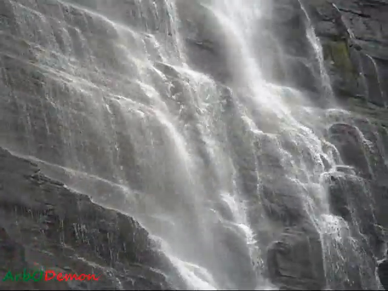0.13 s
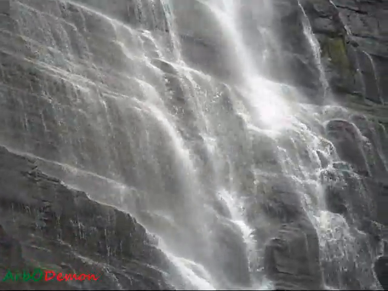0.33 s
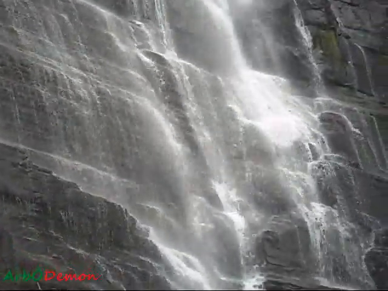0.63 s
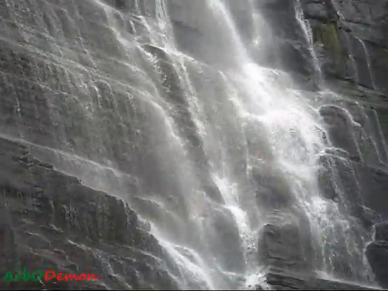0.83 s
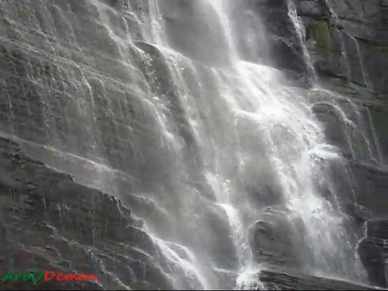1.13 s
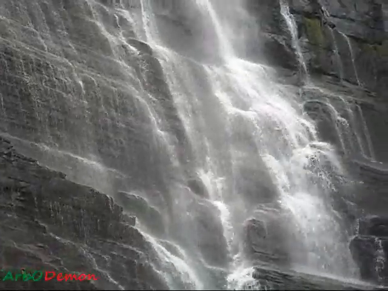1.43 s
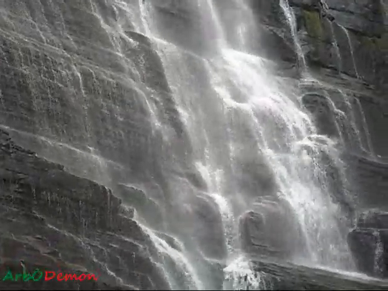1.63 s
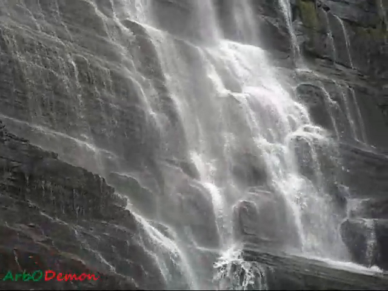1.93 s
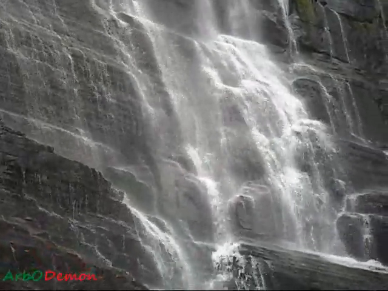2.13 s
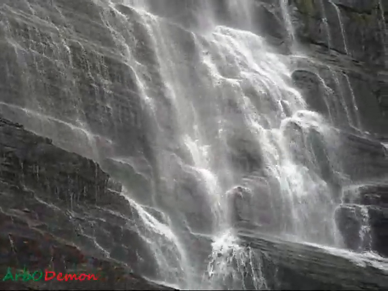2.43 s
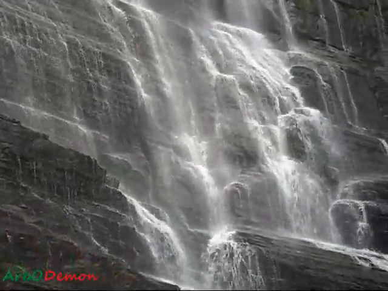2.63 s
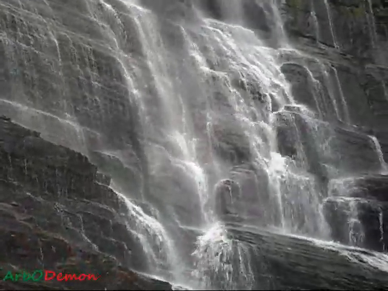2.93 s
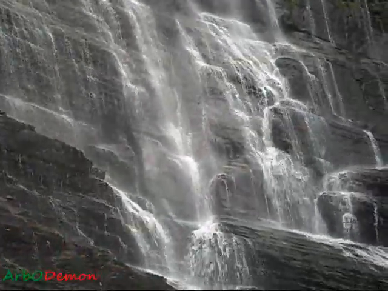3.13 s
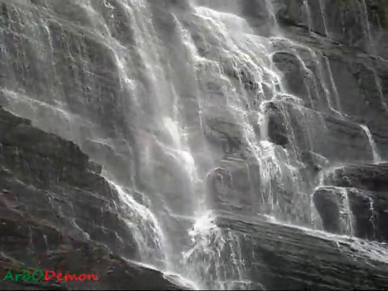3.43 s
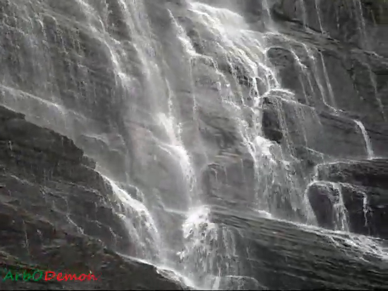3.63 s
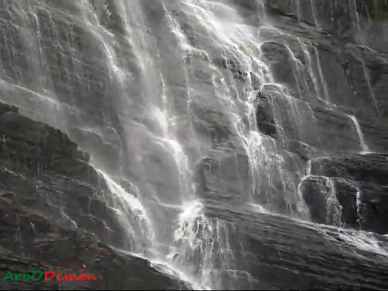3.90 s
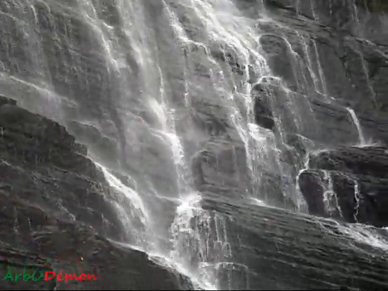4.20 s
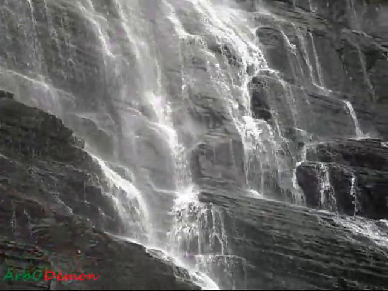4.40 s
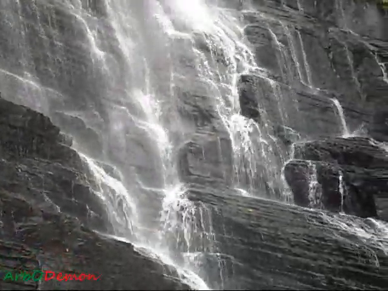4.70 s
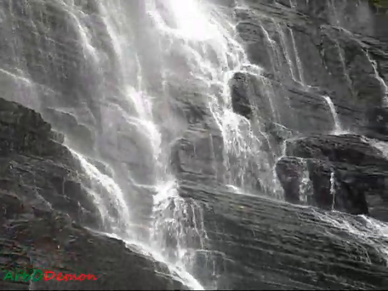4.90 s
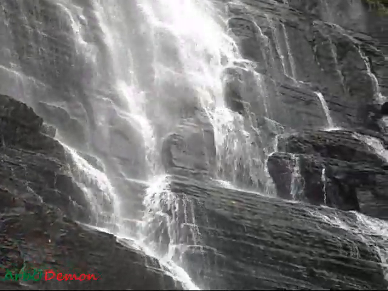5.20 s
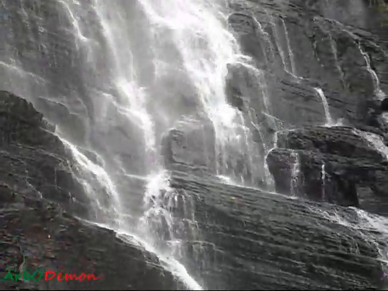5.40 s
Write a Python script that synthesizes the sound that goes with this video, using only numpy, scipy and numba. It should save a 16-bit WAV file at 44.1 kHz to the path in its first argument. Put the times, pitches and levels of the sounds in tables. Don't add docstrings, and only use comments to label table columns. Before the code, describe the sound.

Continuous hissing roar of water falling down a rock face, heard from across its pool, even from start to end. Faint wind rumble comes and goes, with dull pops and flutters bunched around 2.1 to 2.6 seconds, a small bump near 3.4 and a soft deep swell near 4.5. Small unshielded camera microphone, essentially mono, slightly grainy high end, no clear echo.

```python
import sys
import numpy as np
from scipy import signal
from scipy.fft import rfft, irfft
from scipy.io import wavfile
from scipy.ndimage import uniform_filter1d
from numba import njit

SR = 44100
rng = np.random.default_rng(int(sys.argv[2]) if len(sys.argv) > 2 else 0)


def undo_db(level):
    steps = np.asarray(level, float) / 20
    return 10 ** steps


def to_wav(s):
    ch = np.atleast_2d(s).T
    pcm = np.round(np.clip(ch, -1, 1) * 32767)
    wavfile.write(sys.argv[1], SR, pcm.astype(np.int16))


N = 244755
TIME = np.arange(N) / SR
HZ = np.maximum(np.fft.rfftfreq(N, 1 / SR), 1)

# centre_s, length_s, buffet_db, swing_db (deep swing relative to the buffet)
GUSTS = [(0.08, .1, -52, -5), (0.293, .07, -48, -2), (0.72, 0.11, -52, -5), (1.072, .08, -53, -5),
         (1.88, 0.17, -46, -2), (2.05, .1, -50, -1), (2.192, 0.19, -40, -1), (2.45, .1, -43, -1),
         (2.523, .09, -39, -1), (2.62, .14, -48, -2), (2.81, 0.05, -44, -12), (3.11, 0.063, -48, -6),
         (3.37, 0.062, -45, -12), (3.74, .15, -51, -5), (4.247, 0.09, -55, -3), (4.51, 0.092, -49, 8),
         (4.79, .14, -55, 5), (5.29, .12, -56, -6)]
BREEZE_DB, BREEZE_SWING_DB, BREEZE_WANDER_DB = -57, -3.5, 2.5
RISE_SHARE = 0.5
# pitch_hz, density_db (per Hz)
SWING = [(12, -7), (25, 6), (50, -10), (80, -15), (150, -57)]
# pitch_hz, density_db (per Hz)
BUFFET = [(30, -10), (60, -2), (110, -4), (220, -7), (400, -31), (800, -40)]
# centre_s, depth_db, width_ms
SUCKS = [(1.823, -31, 3.2), (2.14, -28.5, 3.6), (2.169, -34, 7.0), (2.177, -25, 5.2), (2.193, -39, 6.8),
         (2.213, -26, 2.6), (2.228, -31, 4.9), (2.247, -29, 2.8), (2.434, -30, 7.3), (2.446, -25.5, 2.4),
         (2.482, -40, 6.1), (2.501, -27, 4.0), (2.511, -35, 1.8), (2.527, -23, 1.8), (2.536, -24, 3),
         (2.547, -35.8, 4.7), (3.37, -33, 4.8)]
# centre_s, height_db, width_ms
PUSHES = [
    (1.882, -34, 3.1),
    (2.614, -30, 2.9),
    (2.808, -36, 2.3),
    (3.385, -31, 1.3),
    (4.52, -38, 17),
]
# start_s, level_db, treble_db (treble share)
FLOW = [
    (0.0, -31.5, -13.5),
    (0.43, -31.5, -13),
    (3.29, -32, -14),
    (4.92, -32.5, -13.5),
    (5.38, -32, -13),
    (5.55, -31.5, -14),
]
# pitch_hz, density_db (per Hz)
RUSH = [(130, -11), (370, -6), (495, -7.5), (670, -3.5), (980, -0.5), (1300, -3.5), (1950, -1), (2700, -2),
        (3050, -3), (3700, -3.5), (4300, -6), (5900, -7), (6900, -12.5), (9500, -12.5)]
# pitch_hz, gain_db
ANTI_ALIAS = [(8800, 0), (10100, -2), (10600, -6.5), (11025, -12)]
TOP_HZ = 15740
# centre_s, low_hz, high_hz
WIDE_BANDS = [(1.495, 4590, 6370), (2.099, 4130, 6390), (2.354, 7490, 9020), (2.354, 13090, 14510),
              (3.353, 8200, 10400), (3.353, 11650, 13850), (4.537, 5080, 6370), (5.35, 14380, 15740),
              (5.489, 4130, 5210), (5.489, 7510, 9000)]


def unit(x):
    return x / np.sqrt(np.mean(x ** 2))


def colour(table):
    hz, db = np.transpose(table)
    return undo_db(np.interp(np.log(HZ), np.log(hz), db))


def walk(rate):
    hold = int(SR / rate)
    levels = np.repeat(rng.standard_normal(N // hold + 1), hold)
    smooth = uniform_filter1d(uniform_filter1d(levels, hold), hold)
    return unit(smooth[:N])


def eddies(table):
    out = 0
    for centre_s, level_db, width_ms in table:
        u = (TIME - centre_s) / (0.0005 * width_ms)
        out = out + undo_db(level_db) * (1 - 0.84 * u ** 2) * np.exp(-u ** 2 / 2)
    return out


def gust_power():
    draught = undo_db(BREEZE_DB + BREEZE_WANDER_DB * walk(9.8)) ** 2
    swing, buffet = draught * undo_db(BREEZE_SWING_DB) ** 2, draught
    for centre_s, length_s, buffet_db, swing_db in GUSTS:
        side_s = np.where(TIME < centre_s, RISE_SHARE, 1 - RISE_SHARE) * length_s
        swell = np.exp(-2 * ((TIME - centre_s) / side_s) ** 2)
        swing = swing + swell * undo_db(buffet_db + swing_db) ** 2
        buffet = buffet + swell * undo_db(buffet_db) ** 2
    return swing, buffet


def wind(patchy_db):
    out = eddies(PUSHES) - eddies(SUCKS)
    for table, power in zip((SWING, BUFFET), gust_power()):
        rumble = irfft(rfft(rng.standard_normal(N)) * colour(table), N)
        patchy = rumble * undo_db(patchy_db * walk(30.2))
        out = out + unit(patchy) * np.sqrt(power)
    return out


@njit
def ring(start, hz, cycles, size, rise, n):
    y = np.zeros(n)
    for k in range(len(start)):
        span, phase = cycles * SR / hz[k], 0.
        for i in range(min(int(4 * span), n - start[k])):
            phase += 2 * np.pi * hz[k] * (1 + rise * i / span) / SR
            y[start[k] + i] += size[k] * np.exp(-i / span) * np.sin(phase)
    return y


def bubbles(count, cycles, rise, spread_db):
    when, octave = rng.random((count, 2)).T
    start = (when * N).astype(np.int64)
    pitch_hz = 150 * 2 ** (6.2 * np.sqrt(octave))
    size = undo_db(spread_db * rng.exponential(size=count))
    cloud = rfft(ring(start, pitch_hz, cycles, size, rise, N))
    return cloud / np.sqrt(uniform_filter1d(abs(cloud) ** 2, size=2001))


def fall(share, surge_db, flicker_db):
    start_s, level_db, treble_db = np.transpose(FLOW)
    splash = rfft(rng.standard_normal(N)) / np.sqrt(N)
    cloud = bubbles(count=90000, cycles=2.5, rise=.06, spread_db=1.0)
    bubbly = share * (HZ > 150)
    mix = np.sqrt(1 - bubbly) * splash + np.sqrt(bubbly) * cloud
    mix = mix * colour(RUSH) * (HZ < SR / 4)
    half_octave = 2 * np.log2(HZ / 30)
    tilt_db = np.interp(TIME, start_s, treble_db - np.mean(treble_db))
    out, surge = 0, walk(1.8)
    for k in range(19):
        surge = unit(.8 * surge + .6 * walk(5.5))
        band = irfft(mix * np.clip(1 - abs(half_octave - k), 0, 1), N)
        gain_db = surge_db * surge + flicker_db * walk(12) + tilt_db * (k > 14)
        out = out + band * undo_db(gain_db)
    return unit(out) * undo_db(np.interp(TIME, start_s, level_db))


def scene():
    mono = wind(patchy_db=1.5) + fall(share=0.27, surge_db=0.22, flicker_db=0.45)
    return np.array([mono, mono])


def hold_twice(mono):
    half = irfft(rfft(mono) * colour(ANTI_ALIAS), N)[::2]
    return np.repeat(half, 2)[:N]


def wide_noise(spectrum):
    density = np.sqrt(uniform_filter1d(abs(spectrum) ** 2, size=2001) / N)
    side = np.zeros(N)
    for centre_s, low_hz, high_hz in WIDE_BANDS:
        swell = np.cos(np.pi / 2 * np.clip((TIME - centre_s) * SR / 1024, -1, 1)) ** 2
        band = (HZ > low_hz) * (HZ < high_hz)
        side += swell * irfft(rfft(rng.standard_normal(N)) * density * band, N)
    return side * undo_db(-2.5)


def band_limit(x):
    return signal.sosfilt(signal.butter(12, 17070, fs=SR, output="sos"), x)


def record(dry):
    spectrum = rfft(hold_twice(dry[0]))
    mid = irfft(spectrum * (HZ < TOP_HZ), N)
    side = wide_noise(spectrum)
    return band_limit(np.array([mid + side, mid - side]))


dry = scene()
out = record(dry)
to_wav(out)
```